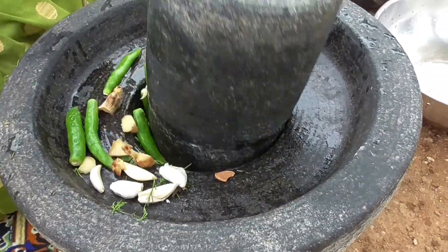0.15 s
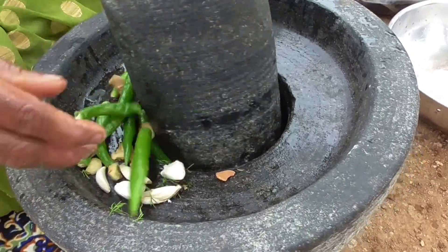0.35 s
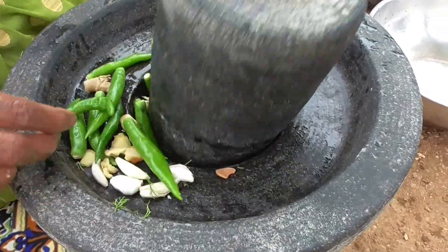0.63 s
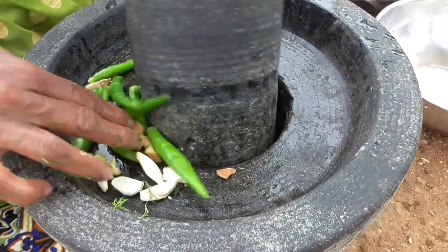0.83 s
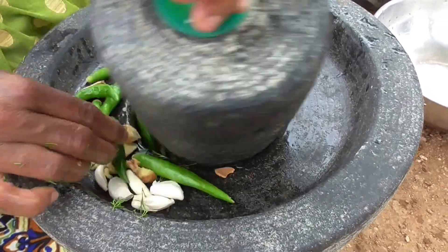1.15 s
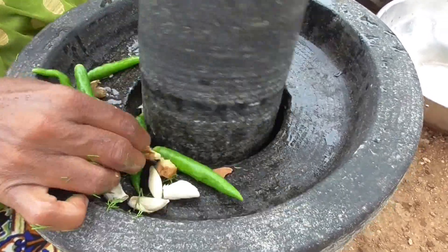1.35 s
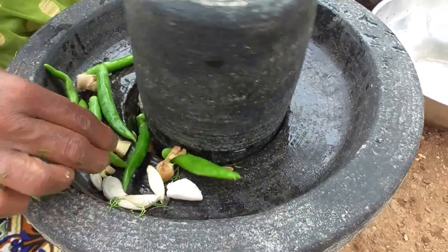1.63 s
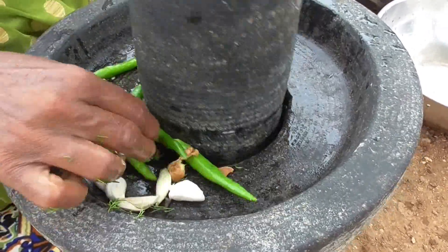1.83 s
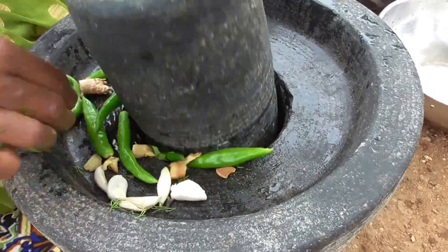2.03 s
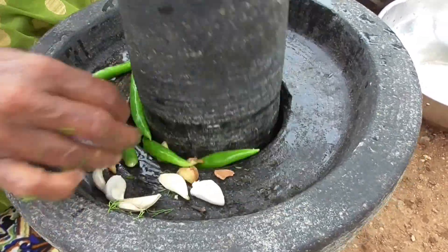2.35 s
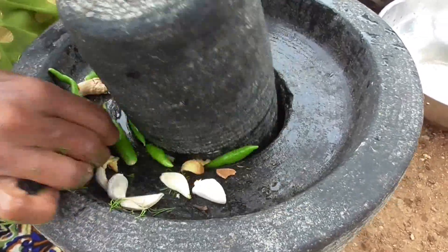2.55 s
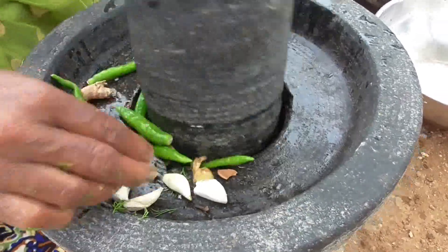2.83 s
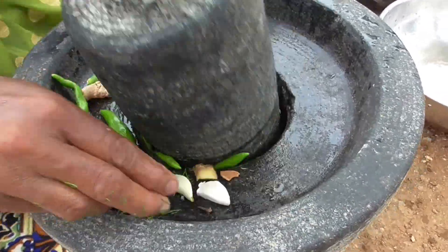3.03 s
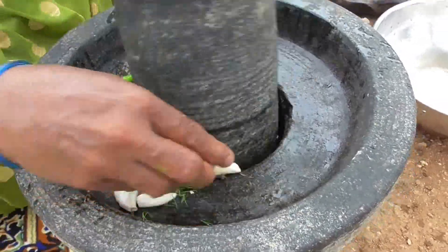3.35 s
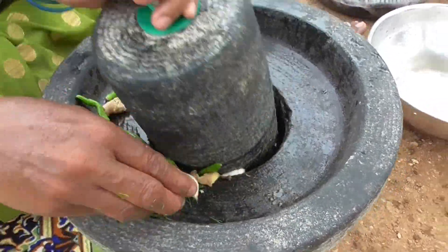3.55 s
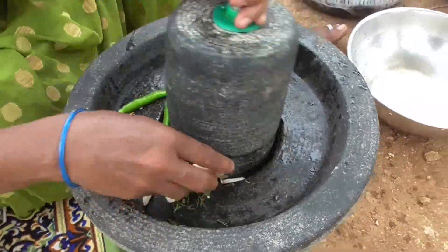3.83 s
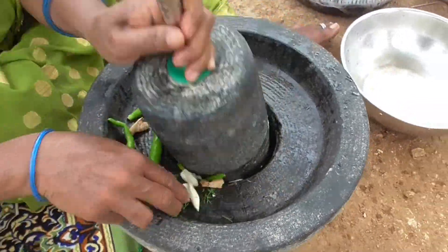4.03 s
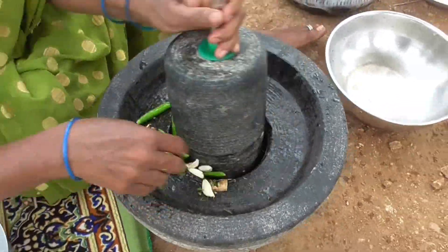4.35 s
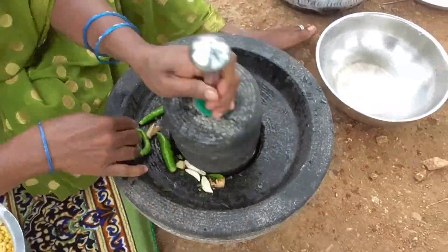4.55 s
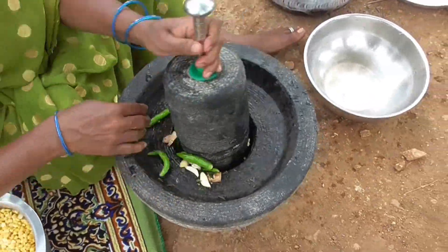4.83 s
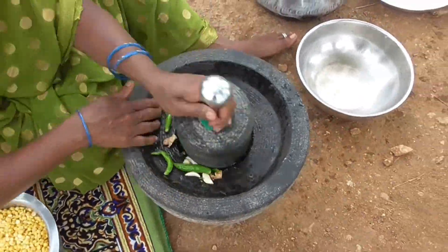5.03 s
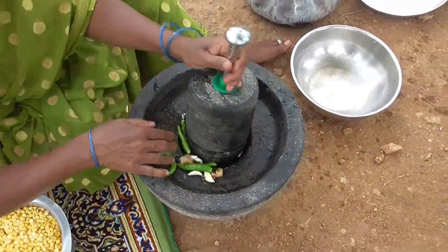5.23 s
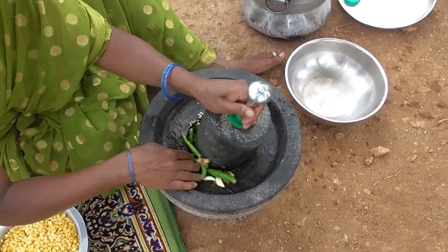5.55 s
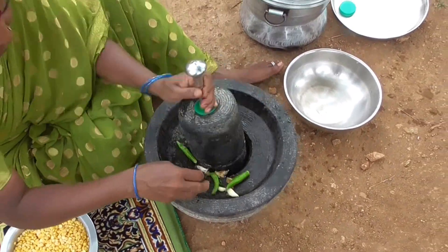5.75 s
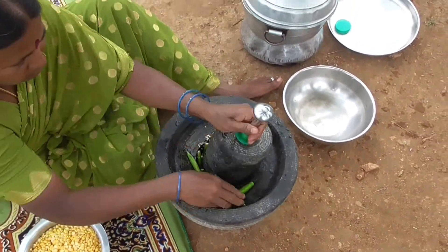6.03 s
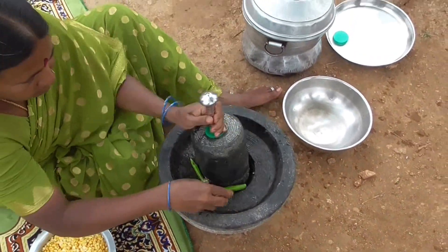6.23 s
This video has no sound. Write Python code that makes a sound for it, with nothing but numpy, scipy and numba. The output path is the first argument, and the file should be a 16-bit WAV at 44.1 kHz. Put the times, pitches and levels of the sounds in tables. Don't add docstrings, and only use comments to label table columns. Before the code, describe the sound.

Outdoors, very near a phone microphone, a heavy stone roller is turned by hand in a stone basin. From the start it lands in firm, hollow, low-mid knocks about every quarter second, some doubled by softer rebounds, each dying quickly. Coarse stone rubbing swells between them, strongest around 0.6 to 1.8 seconds. Chillies and garlic crunch and snap brightly, with a sharp crack near 2.2 and a cluster of small crackles around 3.1 to 3.8. Glass bangles tinkle lightly in the first second, again near 2.5 and 3.8, and in a small flurry from 5.5 to 5.9. After 4 seconds the knocking continues steadily with less scraping, and a distant motor's low puttering emerges, nearest around 5.75, then easing. Knocks thin out and soften slightly towards the end at about 6.4 seconds, over quiet open-air hiss.

```python
import sys
import numpy as np
from scipy import signal
from scipy.io import wavfile
from scipy.ndimage import uniform_filter1d, minimum_filter1d
from numba import njit

SR = 44100
rng = np.random.default_rng(int(sys.argv[2]) if len(sys.argv) > 2 else 0)


def convert_level_to_amplitude(level_db):
    exponent = np.asarray(level_db, float) / 20
    return 10 ** exponent


def file_out(sig):
    cols = np.atleast_2d(sig).T
    lim = np.clip(cols, -1, 1)
    pcm = np.round(lim * 32767).astype(np.int16)
    wavfile.write(sys.argv[1], SR, pcm)


N = 282240


def level(x, db=0):
    return x * convert_level_to_amplitude(db) / np.sqrt(np.mean(x ** 2))


def curves(table):
    s, *columns = np.transpose(table)
    return [np.interp(np.arange(N) / SR, s, column) for column in columns]


@njit
def svf(x, hz, width):
    y, band_state, low_state = np.empty(len(x)), 0., 0.
    for i in range(len(x)):
        g, k = np.tan(np.pi * hz[i] / SR), width / hz[i]
        v = (band_state + g * (x[i] - low_state)) / (1 + g * (g + k))
        band_state = 2 * v - band_state
        low_state += 2 * g * v
        y[i] = k * v
    return y


def band(x, hz, width):
    centre = np.clip(hz + np.zeros(len(x)), 20, .45 * SR)
    return svf(x, centre, float(max(width, 5)))


def low_pass(x, order, hz):
    return signal.sosfilt(signal.butter(order, hz, fs=SR, output="sos"), x)


@njit
def follow(x, attack, release):
    y, e = np.empty(len(x)), 1e-6
    for i in range(len(x)):
        e += (x[i] - e) * (attack if x[i] > e else release)
        y[i] = e
    return y


def walk(rate):
    k = int(SR / rate)
    steps = np.repeat(rng.standard_normal(N // k + 1), k)
    return 2.05 * uniform_filter1d(uniform_filter1d(steps, k), k)[:N]


def ring(modes, push_s, length_s=.3):
    t = np.arange(int(length_s * SR)) / SR
    x = np.zeros(len(t))
    for hz, db, t60 in modes:
        decay = np.exp(-np.log(1000) * t / max(t60, .004))
        x += convert_level_to_amplitude(db) * decay * np.sin(2 * np.pi * hz * t)
    return x * np.sin(np.pi / 2 * np.clip(t / push_s, 0, 1)) ** 2


def add(out, s, x, pan_db=0.):
    i = max(int(s * SR), 0)
    out[:, i:i + len(x)] += convert_level_to_amplitude(np.array([[pan_db], [-pan_db]]) / 2) * x[:N - i]


def grit(per_s, scatter_db):
    size_db = scatter_db * np.minimum(rng.exponential(size=N), 3)
    return level((rng.random(N) < per_s / SR) * rng.standard_normal(N) * convert_level_to_amplitude(size_db))


def strokes(s, db, rise_s, fall_s, floor_db):
    coarse = np.arange(0, N, 64)
    late = coarse[:, None] / SR - s
    away = np.where(late < 0, -late / np.maximum(rise_s, .01), late / fall_s)
    power = convert_level_to_amplitude(db - 16 * away) ** 2
    gain = np.sqrt(np.sum(power, axis=1) + convert_level_to_amplitude(floor_db) ** 2)
    return np.interp(np.arange(N), coarse, gain)


# pitch in Hz, level in dB per Hz.
AIR_COLOUR = [(18, -58), (30, -25), (114, 15), (379, -1), (546, 13.5), (787, -1.5), (1360, -2.5),
              (1770, -72), (3320, 3.5), (5890, -51), (9940, -6), (12600, -23), (15500, -32)]


def yard():
    out, (f, db) = 0, np.transpose(AIR_COLOUR)
    for hz in 40 * 2 ** np.arange(0, 8.7, .5):
        mid, side = (band(rng.standard_normal(N), hz, hz / 3) for _ in range(2))
        stereo = mid + np.clip(hz / 9000, .2, .7) * side * np.array([[1], [-1]])
        out = out + convert_level_to_amplitude(np.interp(np.log(hz), np.log(f), db) + 0.5 * walk(1.83)) * stereo
    return level(out, -46.5)


# time in seconds, level in dB.
MOTOR_LEVEL = [
    (0.0, -67),
    (2.3, -92),
    (4.08, -52),
    (5.15, -49.5),
    (5.75, -45),
    (6.4, -48.5),
]


def exhaust(x):
    return level(band(band(x, 115, 130), 98, 150) + 0.11 * band(band(x, 180, 120), 180, 120))


def engine():
    firing_hz = 18.7 + 1.6 * np.arange(N) / SR
    turns = np.cumsum(firing_hz * (1 + 0.004 * walk(22))) / SR
    firing = np.diff(np.floor(turns), prepend=0) * convert_level_to_amplitude(walk(26))
    sound = exhaust(firing) + 0.4 * exhaust(rng.standard_normal(N))
    return convert_level_to_amplitude(curves(MOTOR_LEVEL)[0]) * sound * convert_level_to_amplitude([[-.8], [.8]])


# time of the top in seconds, level in dB, rise in seconds.
RUBS = [(0.09, -41, 0.54), (0.36, -43.5, 0.27), (0.64, -32, 0.13), (0.89, -39, 0.12), (1.2, -30, 0.029),
        (1.299, -29, 0.19), (1.42, -43, 0.055), (1.51, -34, 0.36), (1.722, -28.5, 0.13),
        (1.93, -38.5, 0.095), (2.021, -39.5, 0.13), (2.25, -45.5, 0.67), (2.419, -40.5, 0.085),
        (2.63, -40.5, 0.031), (2.76, -48, 0.044), (2.95, -39.5, 0.087), (3.14, -43.5, 0.14),
        (3.42, -35.5, 0.027), (3.619, -41.5, 0.073), (3.79, -43, 0.099), (4.0, -46.5, 0.4),
        (4.16, -41, 0.18), (4.45, -44, 0.073), (4.68, -46.5, 0.61), (4.941, -38, 0.1), (5.08, -45, 0.08),
        (5.48, -56, 0.44), (5.9, -54, 0.57), (6.39, -50, 0.21)]
# pitch in Hz, width in Hz, level in dB.
SCRAPE_BANDS = [
    (350, 324, -1),
    (800, 510, -3),
    (1404, 110, -4.5),
    (1268, 14, -2),
]


def rubbing():
    s, db, rise_s = np.transpose(RUBS)
    drag = strokes(s, db, rise_s, fall_s=0.059, floor_db=-56.5)
    hz = np.minimum(curves(sorted(hit[:3] for hit in BLOWS + BUMPS))[1], 570)
    rub = convert_level_to_amplitude(2.86 * walk(45)) * (grit(900, scatter_db=5.5) + 0.66 * rng.standard_normal(N))
    rumble = band(band(rub, hz, 102), hz, 210) * convert_level_to_amplitude(7.0)
    for f, width, db in SCRAPE_BANDS:
        rumble += convert_level_to_amplitude(db) * band(band(rub, f, 0.79 * width), f, 0.71 * width)
    roller = convert_level_to_amplitude(-12) * band(rub, 3243, 40)
    rumble = low_pass(rumble, 8, 1500) + roller
    return convert_level_to_amplitude(4.5) * drag * level(rumble) * convert_level_to_amplitude([[-.8], [.8]])


# time of the top in seconds, level in dB, grit minus crunch in dB, rise in seconds.
CRUSHES = [(0.04, -38, 0, 0.16), (0.36, -50, 1, 0.093), (0.549, -42, 0, 0.1), (0.89, -49.5, -0.5, 0.23),
           (1.05, -44.5, 2, 0.13), (1.3, -51.5, -14, 0.66), (1.42, -40, -1.5, 0.056), (1.72, -47, 2, 0.3),
           (2.02, -48, 7, 0.18), (2.167, -37, -4, 0.11), (2.32, -51, -9, 0.034), (2.42, -46, 2.5, 0.032),
           (2.63, -45, 2.5, 0.095), (2.76, -46, -6, 0.16), (2.95, -50, 5, 0.07), (3.149, -41, -4, 0.098),
           (3.37, -49.5, -9, 0.037), (3.619, -43, -4, 0.095), (3.75, -42.5, -13, 0.053),
           (4.16, -48.5, -1.5, 0.41), (4.45, -51.5, 1, 0.36), (4.62, -43, -5.5, 0.14), (4.93, -51, 2, 0.15),
           (5.08, -46.5, -4.5, 0.15), (5.48, -46.5, -4.5, 0.22), (5.85, -50.5, -2.5, 0.098),
           (5.96, -47.5, 0, 0.078), (6.1, -54.5, -6, 0.88), (6.39, -49, -20, 0.19)]
# pitch in Hz, width in Hz, level in dB.
CRUNCH_BANDS = [
    (8790, 3840, 20.5),
    (11100, 4500, 15.5),
    (14500, 3000, -46),
]


def crushing():
    s, db, grit_db, rise_s = np.transpose(CRUSHES)
    crush, grind = (strokes(s, g, rise_s, fall_s=0.081, floor_db=-62.5) for g in (db, db + grit_db))
    out = np.zeros((2, N))
    for side in ([[1], [.45]], [[.45], [1]]):
        patch = convert_level_to_amplitude(3.2 * walk(110))
        tear = patch * (grit(2500, scatter_db=1.0) + 0.81 * rng.standard_normal(N))
        crunch = np.zeros(N)
        for f, width, db in CRUNCH_BANDS:
            source = patch * grit(800, scatter_db=3.5) + .5 * tear
            crunch += convert_level_to_amplitude(db) * band(band(source, f, 1.53 * width), f, 1.53 * width)
        sand = band(band(tear, 3790, 2350), 1800, 6300)
        out += np.array(side) * (convert_level_to_amplitude(8.5) * crush * level(crunch) + convert_level_to_amplitude(2.0) * grind * level(sand))
    return out


# start in seconds, peak in dB.
SNAPS = [(0.047, -6), (0.873, -0.5), (1.033, -11), (1.058, -13), (1.729, -8.5), (2.096, -14), (2.162, -3),
         (2.1679, 1.5), (2.209, -6.5), (2.415, -3.5), (2.431, -9), (2.652, -6.5), (2.747, -12), (3.153, -9),
         (3.193, -7), (3.3322, -16.5), (3.55, -7.5), (3.566, -17), (3.6241, -8.5), (3.6368, -9),
         (3.655, -13), (3.688, -21), (3.711, -6), (3.725, -9), (3.7414, -12), (3.781, -12), (3.822, -21),
         (4.1694, -14.5), (4.592, -19), (4.614, -8), (4.646, -4.5), (4.672, -9), (5.471, -21), (5.526, -11)]
# start in seconds, peak in dB, crack minus peak in dB.
CRACKS = [(0.016, -10, 3), (0.376, -18, 26), (1.676, -24, -17), (1.755, -11.5, 33), (2.632, -8, -14),
          (2.698, -20, -3), (2.723, -10, -10), (3.101, -7.5, 21), (3.109, -7.5, 23), (3.609, -8, 19),
          (4.15, -18, -18), (4.598, -6.5, 8), (4.698, -10, -8), (4.92, -8.5, -2), (5.8456, -9, -16),
          (5.853, -8, -5)]


def snaps():
    out, t = np.zeros((2, N)), np.arange(-400, 600) / SR
    bursts = [(s, db, -19) for s, db in SNAPS] + CRACKS
    chance = rng.standard_normal((len(bursts), 2002))
    for (s, db, low_db), row in zip(bursts, chance):
        faint_clicks = 0.068 * (row[1002:] > 1.8) * np.exp(-np.abs(t) / 0.0019)
        burst = row[2:1002] * (1.13 * np.exp(-np.abs(t) / 0.00057) + faint_clicks)
        bright = band(band(burst, 11000 + 1500 * row[1], 3950), 6300, 13000)
        crack = band(band(burst, 3340, 2700), 3700, 7500)
        sound = convert_level_to_amplitude(db - 0.5) * (bright + convert_level_to_amplitude(low_db - 26.5) * crack)
        add(out, s + t[0] + 0.00053, sound, pan_db=1.5 * row[0])
    return out


# start in seconds, peak in dB, hollow pitch in Hz.
TAPS = [(0.035, -34, 523), (0.473, -35, 664), (0.853, -23, 460), (1.278, -15, 465), (1.446, -22.5, 514),
        (1.66, -24, 540), (1.697, -23, 600), (1.915, -27, 905), (2.219, -31, 597), (2.413, -19.5, 790),
        (2.885, -35, 533), (2.906, -29.5, 636), (2.928, -18.5, 610), (3.097, -36, 587), (3.13, -26.5, 504),
        (3.353, -30.5, 480), (3.383, -29, 533), (3.412, -24, 570), (3.458, -17.5, 543), (3.599, -25.5, 568),
        (3.948, -29, 650), (4.174, -27.5, 570), (4.293, -30, 505), (4.406, -30, 520), (4.617, -34, 580),
        (4.673, -34, 568), (4.883, -25, 590), (5.348, -30, 490), (5.734, -36, 517), (5.803, -27, 513),
        (6.029, -37, 560)]
# start in seconds, peak in dB, colour in Hz.
TICKS = [(.426, -21.5, 1240), (.44, -28, 1170), (.5082, -24, 3450), (0.873, -15.5, 3700),
         (1.0316, -37, 3560), (1.057, -20.5, 2600), (1.286, -36, 3320), (1.735, -15, 5330),
         (1.832, -27.5, 3340), (1.8674, -21.5, 2060), (1.9255, -22, 2980), (1.932, -19, 2120),
         (1.9644, -35, 3500), (2.142, -18.5, 5000), (2.188, -29, 1550), (2.209, -25, 5000),
         (2.4134, -21, 3500), (2.6308, -20.5, 3500), (3.128, -19, 5000), (3.1524, -19, 3300),
         (3.1921, -46, 4500), (3.213, -30, 5600), (3.2809, -35.5, 3500), (3.5493, -36, 3480),
         (3.601, -19.5, 4500), (3.6244, -19.5, 3970), (3.635, -30, 4000), (3.654, -31, 5500),
         (3.71, -25, 5000), (3.7793, -35, 5000), (4.141, -22.5, 3520), (4.155, -26, 3000),
         (4.3703, -23, 4000), (4.3966, -26, 4000), (4.42, -33, 5500), (4.6139, -28, 5040),
         (4.6643, -38.5, 4500), (5.5248, -23.5, 3500), (5.545, -27, 6000), (5.853, -24, 2400),
         (5.868, -31, 2400), (6.37, -28, 3480)]


def pebbles():
    out, t = np.zeros((2, N)), np.arange(-100, 400) / SR
    for s, db, hz in TAPS:
        modes = [(hz, 0, .04), (1.7 * hz, -12, .015)]
        add(out, s, convert_level_to_amplitude(db + 3.5) * ring(modes, push_s=0.0015), pan_db=1.0)
    for (s, db, hz), hiss in zip(TICKS, rng.standard_normal((len(TICKS), len(t)))):
        grain = hiss * np.exp(-np.abs(t) / 0.0012)
        click = band(band(grain, hz, 0.41 * hz), hz, 0.615 * hz)
        add(out, s + t[0] + .0004, convert_level_to_amplitude(db - 6) * click / np.abs(click).max(), pan_db=1.0)
    return out


# start in seconds, peak in dB,
# hollow pitch in Hz, upper pitch in Hz, upper minus peak in dB.
BLOWS = [(0.095, 0.5, 503, 840, 5.5), (0.379, -6.5, 522, 870, 2.5), (0.603, 1, 505.5, 897, 1),
         (0.907, -11, 453, 813, 3.5), (1.153, 0.5, 463, 778, -0.5), (1.49, -1, 505, 830, -2.5),
         (2.015, -7, 620, 850, 3), (2.25, 3, 529, 870, -6), (2.484, 1.5, 575, 864, -1),
         (2.769, -5.5, 700, 890, 3), (2.964, 1, 522, 796, -14.5), (3.237, -14, 690, 880, 7),
         (3.443, -1.5, 547, 936, 3.5), (3.796, -5.5, 520, 870, 5.5), (4.001, 2.5, 603, 830, -6),
         (4.237, -2.5, 498, 942, 8.5), (4.471, -2, 577, 863, -10), (4.702, 0, 551, 896, -4.5),
         (4.93, -0.5, 633, 834, -11), (5.169, -1, 546, 860, 2.5), (5.391, -3, 582, 887, 0.5),
         (5.617, -2.5, 542, 887, -4), (6.085, -7.5, 596, 906, -6), (6.322, -10.5, 577, 874, -6)]
# start in seconds, peak in dB, hollow pitch in Hz,
# upper minus peak in dB.
BUMPS = [(0.325, -12.5, 556, -19), (0.677, -16, 452, -7.5), (0.787, -14, 484, -22), (1.036, -15, 460, -1),
         (1.232, -14, 397, -5.5), (1.303, -11, 456, -33), (1.404, -14, 530, -25), (1.519, -14.5, 512, -10),
         (1.725, -8.5, 640, -24), (1.867, -27, 710, 1.5), (1.937, -31.5, 500, 15.5), (2.03, -4, 593, -4.5),
         (2.257, -4, 645, 2), (2.453, -12.5, 733, 2.5), (2.466, -11.5, 644, -29), (2.629, -15.5, 552, -33),
         (2.776, -5, 444, -4.5), (3.241, -6, 467, -35), (4.006, 0.5, 572, -6), (4.444, -13.5, 647, -19),
         (4.935, 0, 553, -3), (5.693, -24, 502, -39), (5.836, -11, 574, -6)]
# start in seconds, stony tick in dB, basin thump in dB,
# basin edge notes in dB, hollow ring time as a factor.
LANDINGS = [(.095, 10.5, 12, 9.5, 1.04), (.38, 5, 1.5, 5.5, 0.68), (.603, 9.5, 3, 8.5, 1.1),
            (.907, 12.5, 1.5, 6, 0.97), (1.153, -2, 1, 7, 1.1), (1.49, 8.5, -6, 1, 0.83),
            (2.015, 12, -27, 14.5, 0.57), (2.25, 1, 6, -3.5, 1.13), (2.484, 2, -5, -3, 0.55),
            (2.769, -2, 6.5, -16, 0.74), (2.964, 0.5, -9, -4.5, 0.67), (3.239, -12, -14, -8, 0.81),
            (3.443, 11.5, -0.5, 12.5, 0.98), (3.797, 5, -29, 4, 0.71), (4.002, 0, -3, 5, 0.68),
            (4.237, 6.5, 11.5, 6, 0.52), (4.471, 4.5, 5, 0, 0.68), (4.702, 3, 7, 5, 0.98),
            (4.93, 1.5, 3.5, 4.5, 0.66), (5.169, 3, -5, 2, 0.89), (5.391, 8.5, -17.5, 8, 0.64),
            (5.617, -5, -15.5, 2.5, 1.16), (6.086, -2.5, -16, 0.5, 0.99), (6.323, -3, -1, 3, 0.71)]
# start in seconds, deep boom in dB, middle note in dB.
BODY = [(.095, -4.5, 2.5), (.379, -1, 6), (.603, 6, 2), (.907, -11, 5.5), (1.153, -9, 4), (1.49, 12, -4.5),
        (2.015, 11, 5), (2.25, -9, -7), (2.484, 8, -5.5), (2.769, -10, -4), (2.964, -3, 1.5),
        (3.238, -10, -8), (3.443, 11.5, -16), (3.796, 10, -2), (4.002, 9.5, 0.5), (4.237, -3, -7),
        (4.471, -5, 0), (4.702, -8.5, -12.5), (4.93, 1, -4), (5.169, 7, 5.5), (5.391, 29.5, -5),
        (5.617, 3, -5.5), (6.085, 0, -0.5), (6.322, 4, 5.5)]
# pitch in Hz, level in dB, ring time (t60) in seconds.
BASIN = [
    (147.4, -12.5, 0.018),
    (253.6, -9, 0.02),
    (698, 4, 0.02),
    (1074, -5, 0.02),
    (1356, -1.5, 0.013),
]


def hollow_air(hz, db, hard_db, lasting):
    t60 = max(lasting, .8) * (0.036 * (520 / hz) ** 1.5 - 0.0014 * db)
    start = ring([(hz, -4.0, 0.62 * t60)], push_s=0.0022)
    swell = ring([(hz, -4.5 + 0.56 * hard_db, t60)], push_s=0.0079)
    last_breath = ring([(hz, -14, 2.1 * t60)], push_s=0.0034)
    return start + swell + last_breath


def knocks():
    out, t = np.zeros((2, N)), np.arange(600) / SR
    hits = BLOWS + [(s, db, hz, 830, upper_db) for s, db, hz, upper_db in BUMPS]
    landings = [a[1:] + b[1:] for a, b in zip(LANDINGS, BODY)] + [(0, 0, 0, 0.72, 0, 0)] * len(BUMPS)
    noise = rng.standard_normal((len(hits), 600))
    colour = rng.standard_normal((len(hits), len(BASIN)))
    for hit, landing, hiss, tint in zip(hits, landings, noise, colour):
        s, db, hz, upper_hz, upper_db = hit
        tick_db, thump_db, edge_db, lasting, boom_db, middle_db = landing
        hard_db = .5 * min(db + 7, 0)
        shares_db = (thump_db + boom_db, thump_db, middle_db, edge_db, edge_db)
        modes = [(upper_hz, upper_db + 15.0, .012)]
        for (f, g, t60), share_db, c in zip(BASIN, shares_db, tint):
            modes.append((f * (1 + 0.092 * c), g + hard_db + share_db + 0.93 * c, t60))
        hollow = hollow_air(hz, db, hard_db, lasting)
        body = ring(modes, push_s=0.00079)
        push = np.sin(np.pi * np.clip(t / (.0008 - 0.00007 * hard_db), 0, 1)) ** 2
        body, hollow = (signal.fftconvolve(x, push / push.sum()) for x in (body, hollow))
        pits = hiss[::-1] * np.exp(-t / 0.0019)
        rattle = signal.fftconvolve(body, pits / np.sqrt(np.sum(pits ** 2)))[:len(body)]
        blow = convert_level_to_amplitude(4.0) * hollow + body + convert_level_to_amplitude(-10) * rattle
        blow = low_pass(blow, 6, 1550)
        tick = band(band(hiss * np.exp(-t / 0.002), 3850, 3800), 4350, 10600)
        blow[:600] += convert_level_to_amplitude(-20.5 + tick_db + 0.87 * hard_db) * tick
        add(out, s + .0004, blow * convert_level_to_amplitude(db + 0.87 * max(db + 7.0, 0)), pan_db=-0.1)
    return out


# start in seconds, peak in dB.
ROLLER_RINGS = [(0.095, -48), (0.603, -43), (1.1507, -44.5), (1.282, -45), (1.613, -57), (1.701, -42),
                (1.755, -54), (1.965, -56), (2.0192, -42), (2.251, -53), (2.4858, -51), (2.756, -46.5),
                (2.9654, -60), (3.443, -41), (3.63, -51.5), (4.001, -39.5), (4.4713, -45), (4.93, -33.5),
                (5.391, -45), (5.6167, -56)]
# pitch in Hz, level in dB, ring time (t60) in seconds.
ROLLER_NOTE = [
    (3243, 6, .24),
]


def roller_rings():
    out = np.zeros((2, N))
    for s, db in ROLLER_RINGS:
        add(out, s, convert_level_to_amplitude(db) * ring(ROLLER_NOTE, push_s=0.00091), pan_db=5.5)
    return out


# start in seconds, peak in dB, upper note minus lower note in dB,
# left minus right in dB.
CLINKS = [(0.1386, -30, -7, 4), (.2389, -32, 0, 8), (0.258, -25.5, 3, 5), (0.2817, -31.5, 10, 4),
          (0.393, -27, 1.5, 7), (0.415, -31, 7, 1.5), (0.449, -20.5, -4, 5), (0.47, -30, -7, 15),
          (0.514, -18.5, 4, 7), (0.578, -22, -2, 6), (0.842, -23.5, -2, 11), (0.922, -29.5, 5, 5),
          (1.005, -25.5, 2, 10), (1.161, -25, -6, 6), (1.637, -27, -2, 1), (2.495, -28, -3, 12),
          (2.5368, -15, 0, 6), (2.555, -13.5, -8, 7), (2.634, -32, -19, 29), (3.7862, -16.5, -13, 9),
          (5.344, -34, -2, 0), (5.5196, -20, 2, 4), (5.5705, -26.5, -9, 3.0), (5.693, -24, -7, -2.5),
          (5.794, -16.5, 5, 2), (5.87, -21, 0, 2), (5.884, -29, 5, 6), (5.898, -22.5, 4.5, 1),
          (5.939, -16, 11.5, 3), (6.369, -30.5, -1, 3)]
# start in seconds, peak in dB.
THICK_CLINKS = [
    (1.4157, -26),
    (2.3116, -22),
    (2.7551, -20.5),
]
THIN_CLINKS = [
    (1.3843, -20),
]
# start in seconds, peak in dB.
LOW_CLINKS = [
    (.345, -42),
    (.425, -51),
    (.515, -38),
    (2.537, -44),
    (5.74, -50),
    (5.797, -63),
]
# pitch in Hz, level in dB, ring time (t60) in seconds.
BANGLE = [
    (9795, 0, .09),
    (9865, -7, .07),
    (10252, 0, .12),
    (5394, -29, .08),
    (9345, -29, .08),
    (14990, -18, .06),
    (15670, -18, .05),
]
THICK_BANGLE = [(2196, -25, .2), (3768, -19, .14), (5701, -11, .13), (6298, -26, .2), (7246, -28, .18),
                (7921, 0, .09), (10430, 4, .045), (11060, -14, .04), (13086, -6, .11)]
THIN_BANGLE = [
    (4905, -8, .075),
    (9348, 0, .065),
    (14985, -8, .045),
    (15690, -25, .08),
]
LOW_NOTE = [
    (5394, 0, .07),
]


def bangles():
    out = np.zeros((2, N))
    touch = rng.standard_normal((len(CLINKS), len(BANGLE)))
    for (s, db, upper_db, pan_db), tint in zip(CLINKS, touch):
        modes = []
        for (f, g, t60), c in zip(BANGLE, tint):
            change_db = upper_db if 10000 < f < 11000 else 4 * c * (g < 0)
            modes.append((f, g + change_db, t60 * convert_level_to_amplitude(1.5 * c - 1.5)))
        add(out, s, convert_level_to_amplitude(db - 2.0) * ring(modes, push_s=0.00085), pan_db)
    for table, modes in ((THICK_CLINKS, THICK_BANGLE), (THIN_CLINKS, THIN_BANGLE), (LOW_CLINKS, LOW_NOTE)):
        for s, db in table:
            add(out, s, convert_level_to_amplitude(db) * ring(modes, push_s=0.00054), pan_db=6.5)
    out[1, 1:] = 1.1 * out[1, :-1] + 0.32 * out[1, 1:]
    return out


def echoes(near):
    shared, apart = rng.standard_normal((2, 2200)) * np.exp(-np.arange(2200) / SR / 0.0052)
    tail = (shared + 0.66 * np.array([[1], [-1]]) * apart) / np.sqrt(np.sum(shared ** 2))
    return convert_level_to_amplitude(-12.5) * signal.fftconvolve(near, tail, axes=1)[:, :N]


def scene():
    near = knocks() + roller_rings() + rubbing() + crushing() + snaps() + bangles() + pebbles()
    return near + echoes(near) + yard() + engine()


def gain_control(x):
    attack_s, release_s = 0.0024, 0.088
    env = follow(np.abs(x).max(axis=0), 1 / (attack_s * SR), 1 / (release_s * SR))
    return x * np.minimum(convert_level_to_amplitude(-9) / env, 1) ** (1 - 1 / 3)


def limiter(x):
    peak = uniform_filter1d(-minimum_filter1d(-np.abs(x).max(axis=0), size=110), size=70)
    x = x * np.minimum(convert_level_to_amplitude(1.5) / peak, 1)
    return 1.2 * np.tanh(x / 1.2)


def roll_off(x):
    return signal.sosfilt(signal.butter(12, 16830, fs=SR, output="sos"), x)


def record(dry):
    dry = signal.sosfilt(signal.butter(2, 95, "high", fs=SR, output="sos"), dry)
    held = limiter(gain_control(dry))
    held = signal.sosfilt(signal.butter(2, 55, "high", fs=SR, output="sos"), held)
    ports = np.array([[-1], [1]])
    bass = signal.sosfiltfilt(signal.butter(4, 760, fs=SR, output="sos"), held)
    held = held + ports * (0.078 * bass - 1.2 * np.gradient(bass, axis=1))
    air = signal.sosfiltfilt(signal.butter(4, 11500, "high", fs=SR, output="sos"), held)
    held = held + ports * 0.088 * air
    mix = signal.sosfilt(signal.ellip(8, .2, 50, 15900, fs=SR, output="sos"), held)
    return roll_off(mix)


dry = scene()
out = record(dry)
file_out(out)
```